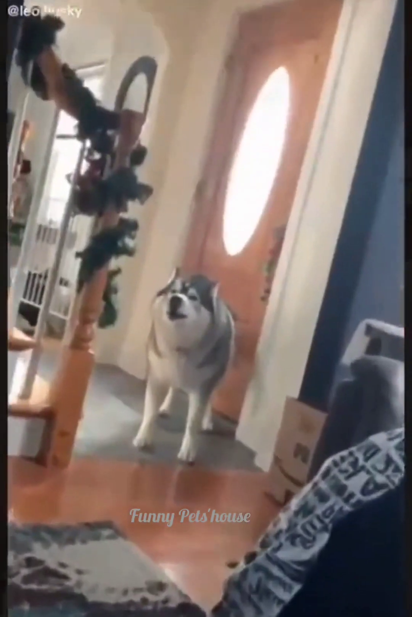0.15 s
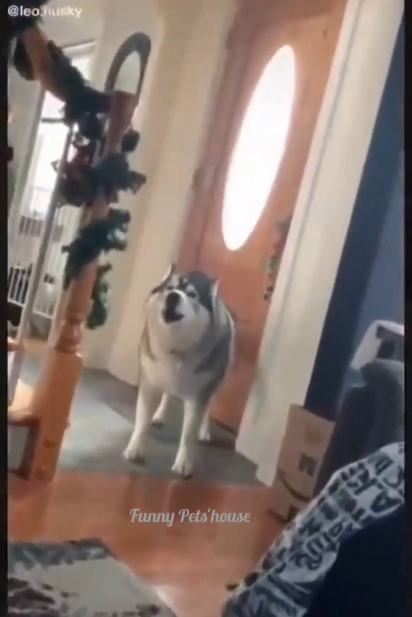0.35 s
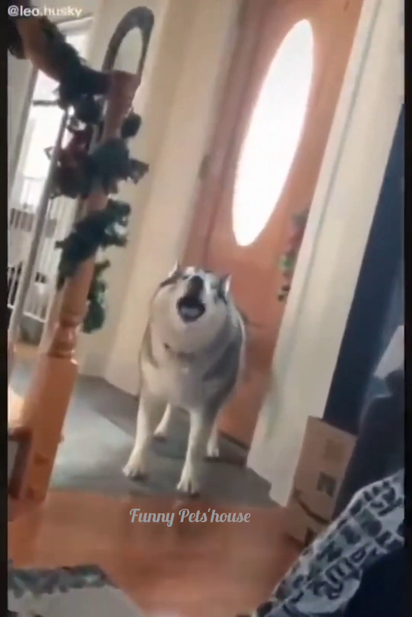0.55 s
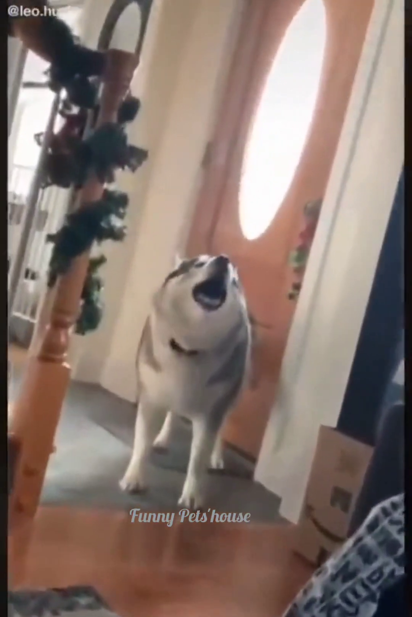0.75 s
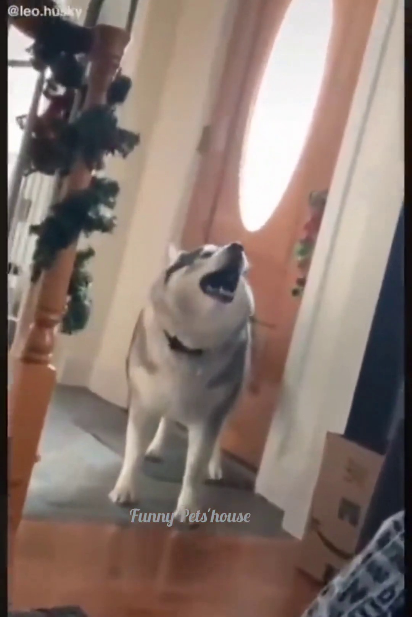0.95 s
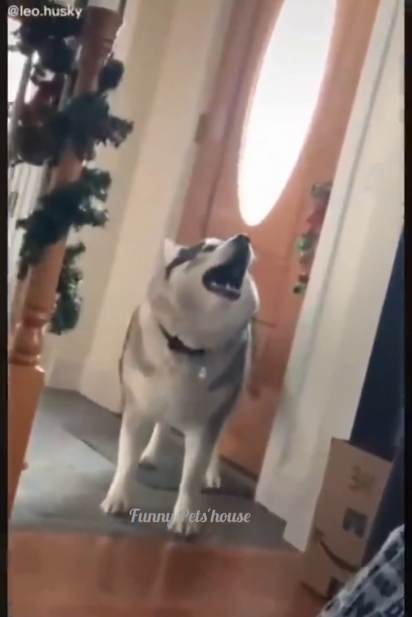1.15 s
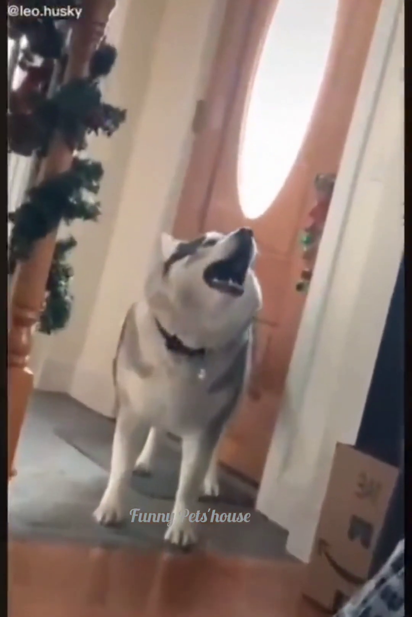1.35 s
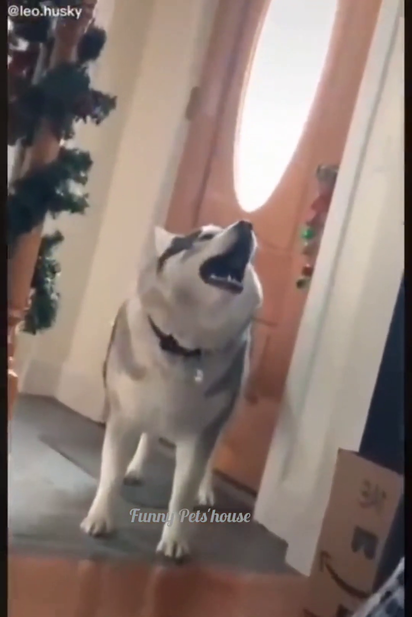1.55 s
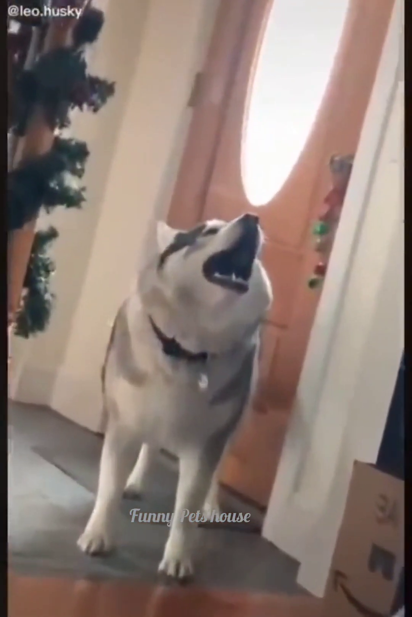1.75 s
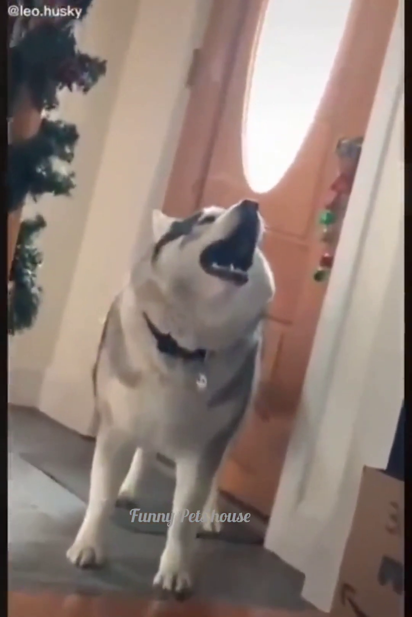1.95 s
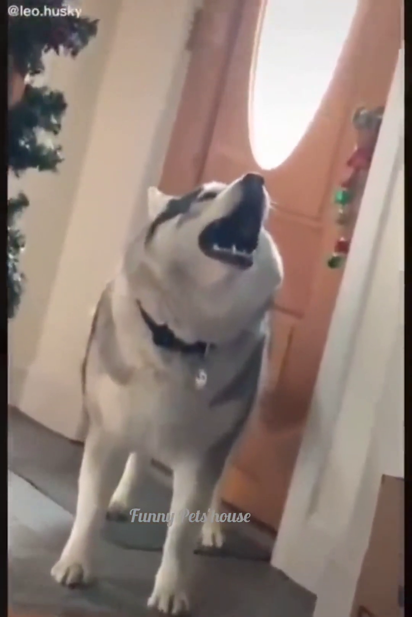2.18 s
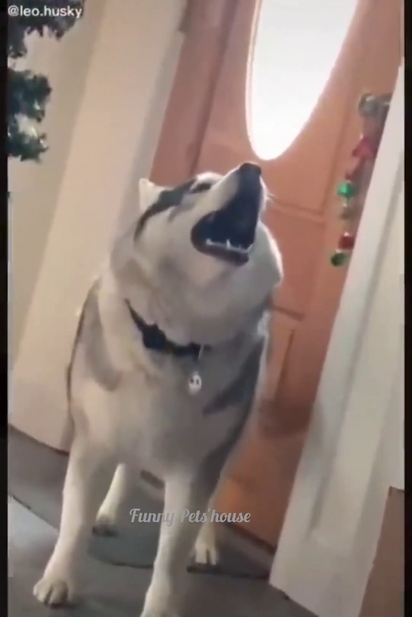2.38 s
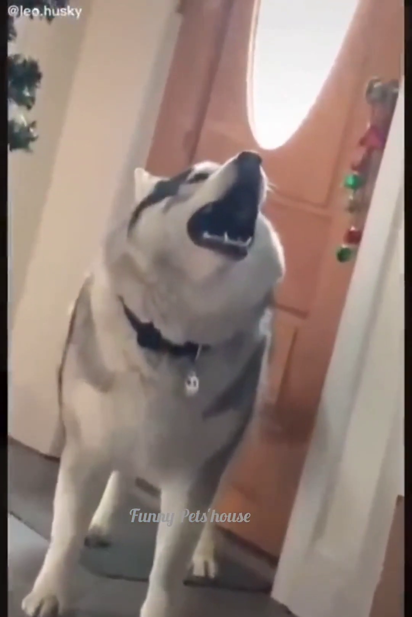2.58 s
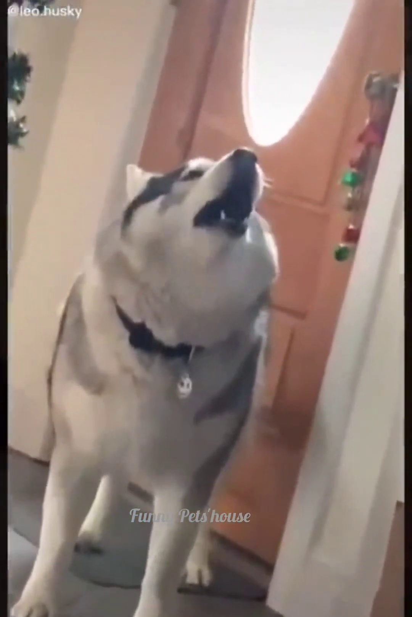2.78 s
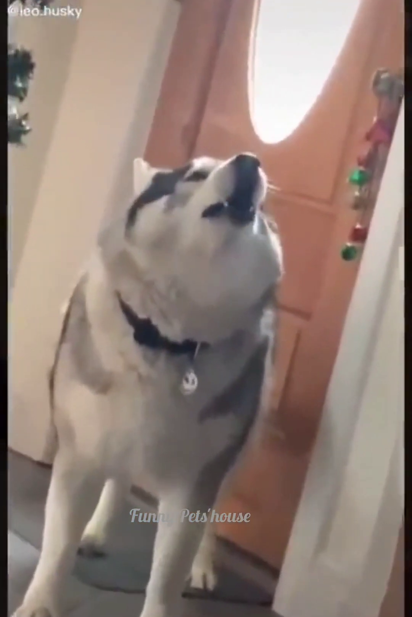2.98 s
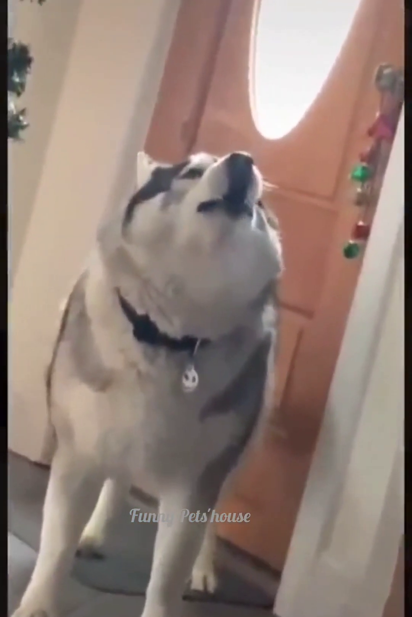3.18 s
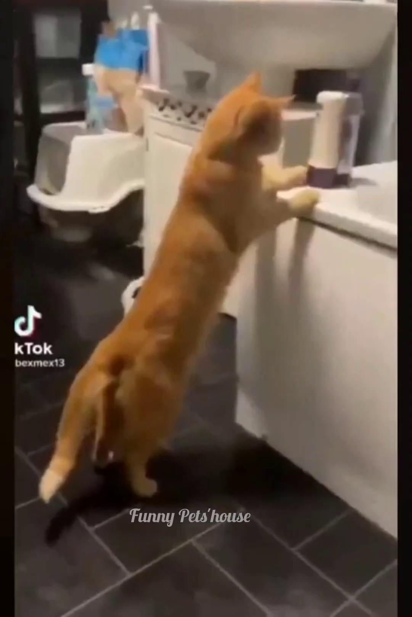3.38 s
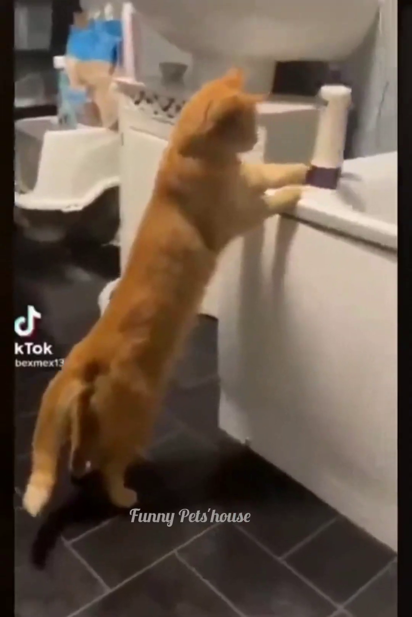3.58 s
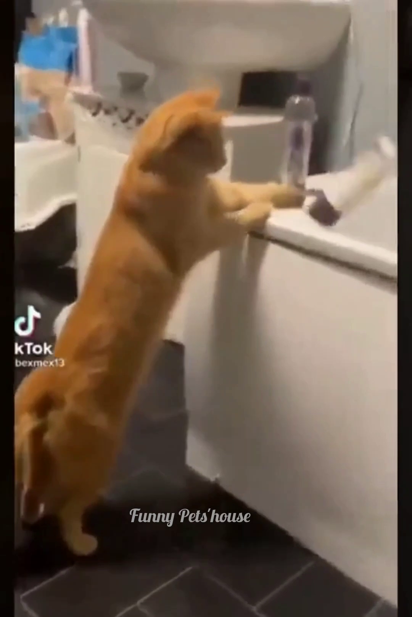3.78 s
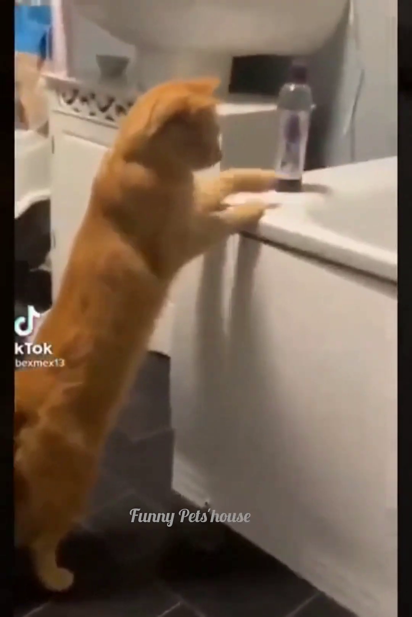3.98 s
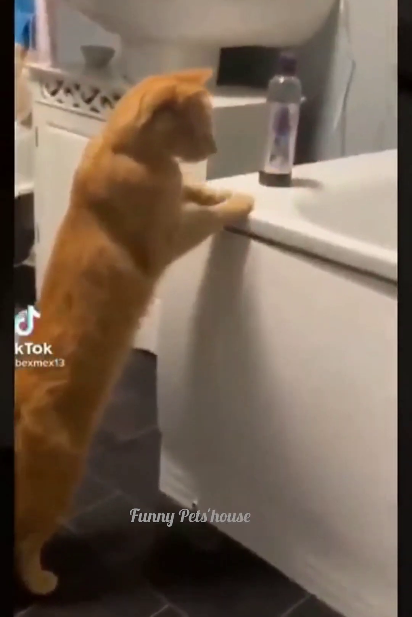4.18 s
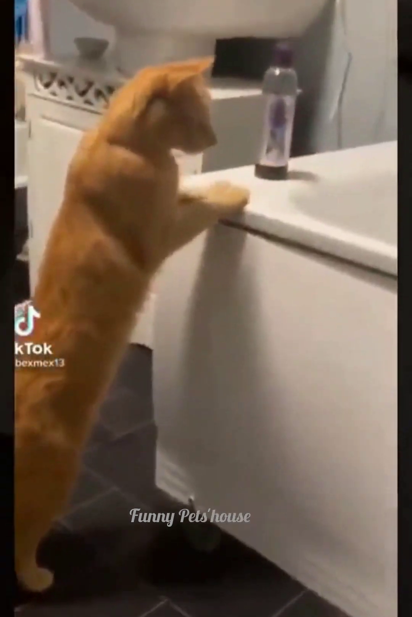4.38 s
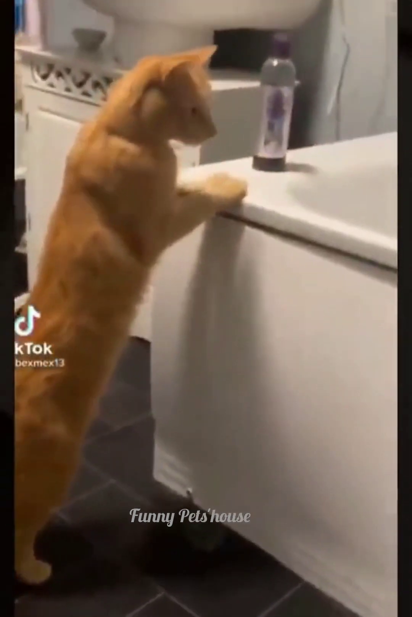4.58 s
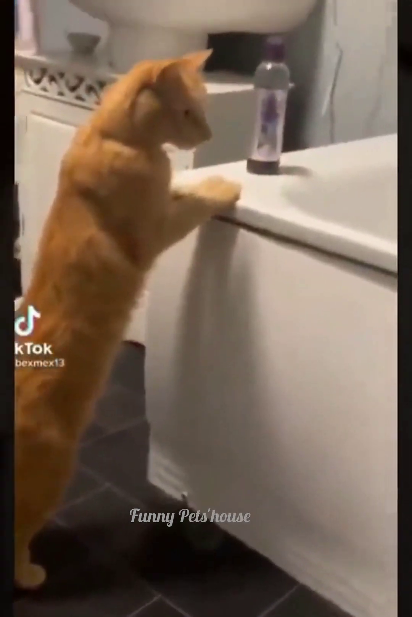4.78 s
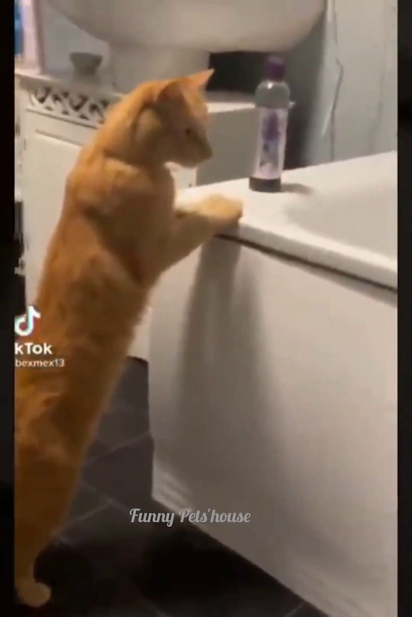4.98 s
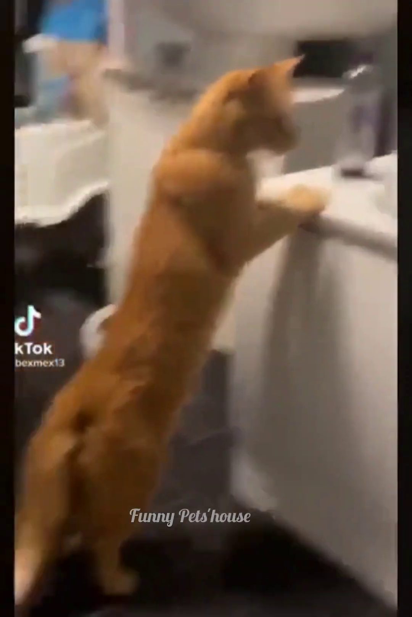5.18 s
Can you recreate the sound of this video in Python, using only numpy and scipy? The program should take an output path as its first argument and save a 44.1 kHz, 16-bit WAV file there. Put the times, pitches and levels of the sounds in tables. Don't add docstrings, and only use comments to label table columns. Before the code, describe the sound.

Quiet hallway rumble and soft hiss open the clip. At about 0.2 s a large dog starts a low, pulsing moan in a half-closed throat, stumbling and rising until 0.6 s, when it breaks with a brief rasp into a loud howl. Faint paw steps fall around 0.7 s. The pitch climbs quickly to a high, clear, almost flute-like note by 1 s and holds, slightly swelling and fading, with a short hall echo. Around 2.4 s it cracks for an instant, resumes softer and sags, ending at 3 s with a small puff as the jaw closes. At 3.4 s the sound cuts to a hushed bathroom. Faint bottle contacts build from 3.5 s; at 4.1 s the bottle hits the empty tub with a sudden deep, hollow bang and plastic clatter. The walls ring dully, uneven knocks follow until 4.6 s, then small rolling rattles fade, with another light knock near 5.1 s.

```python
import sys
import numpy as np
from scipy import signal
from scipy.fft import rfft, irfft, next_fast_len
from scipy.io import wavfile
from scipy.ndimage import uniform_filter1d, minimum_filter1d, map_coordinates

SR = 44100
rng = np.random.default_rng(int(sys.argv[2]) if len(sys.argv) > 2 else 0)


def transcribe(signal):
    frames = np.atleast_2d(signal).T
    limited = np.clip(frames, -1, 1)
    pcm = np.round(limited * 32767).astype(np.int16)
    wavfile.write(sys.argv[1], SR, pcm)


def boost_factor(decibels):
    exponent = np.asarray(decibels, float) / 20
    return 10 ** exponent


N = 231026
TIME = np.arange(N) / SR
CLOCK = np.arange(0, N + 32, 32) / SR
CUT = 3.367
RASP_FLOOR_DB = -71

# time in seconds, pitch in Hz, level in dB.
MOAN = [
    (0.229, 284.2, -58.5),
    (0.251, 281.3, -39.5),
    (0.338, 308.8, -27),
    (0.447, 314.6, -33),
    (.478, 325, -24.5),
    (0.514, 344.8, -25),
    (.535, 347, -17.5),
    (0.569, 375.4, -20.5),
    (0.596, 423.7, -21.5),
]
# time in seconds, rasp level in dB, rasp fall in dB
# per second, level of the half-pitch lines in dB, their fall in dB per second.
BREAKS = [
    (.592, -36, 190, -33, 280),
    (.7, -51, 36, -70, 40),
    (1.635, -58, 3, -80, 5),
    (2.42, -36.5, 150, -33, 220),
    (2.452, -40, 300, -38, 150),
    (2.99, -34, 380, -42.5, 700),
]


def unit(x):
    return x / np.sqrt(np.mean(x ** 2) + 1e-20)


def along(points, hz):
    f, v = np.transpose(points)
    return np.interp(np.log(hz + 1), np.log(f + 1), v)


def curves(rows):
    s, *columns = np.transpose(rows)
    return [np.interp(TIME, s, c) for c in columns]


def gate(start, stop, fade):
    return np.clip(np.minimum(TIME - start, stop - TIME) / fade, 0, 1)


def bell(s, length):
    return np.interp(TIME, CLOCK, np.exp(-((CLOCK - s) / length) ** 2))


def wobble(rate):
    knots = rng.standard_normal(int(N * rate / SR) + 4)
    return np.interp(TIME, CLOCK, map_coordinates(knots, [CLOCK * rate]))


def noise(spectrum):
    m = next_fast_len(N)
    colour = boost_factor(along(spectrum, np.fft.rfftfreq(m, 1 / SR)))
    return unit(irfft(rfft(rng.standard_normal(m)) * colour, m)[:N])


def patchy_field(shape, bins, frames):
    field = uniform_filter1d(rng.standard_normal(shape), size=bins, axis=0)
    return unit(uniform_filter1d(field, size=frames, axis=1))


def patched(x, patchy_db):
    z = signal.stft(x, nperseg=512)[2]
    gain = boost_factor(patchy_db * patchy_field(z.shape, 4, 10))
    return unit(signal.istft(z * gain, nperseg=512)[1][:N])


def rings(rows, unsteady_db, drift):
    out = np.zeros(N)
    for s, hz, db, t60, *rise in rows:
        span = slice(round(s * SR), min(round((s + 1.4) * SR), N))
        t = np.arange(span.stop - span.start) / SR
        rise_s = rise[0] if rise else .01
        fall = boost_factor(db - 60 * t / t60 + unsteady_db * wobble(25)[span])
        swell = (1 - np.exp(-t / rise_s)) * fall
        out[span] += swell * np.sin(2 * np.pi * hz * t + drift * wobble(30)[span])
    return out


def room_air():
    # frequency in Hz, level in dB per Hz.
    rumble_colour = [(15, -19), (30, -1), (70, 1), (120, -5), (200, -27.5), (400, -120)]
    # frequency in Hz, level in dB per Hz.
    hiss_colour = [(100, -50), (170, -8), (450, -3.5), (900, -6.5), (1300, -19), (2000, -9), (3200, -20),
                   (5000, -24.5), (9000, -32.5), (11000, -120)]
    duck_from, duck_to = 0.57, 3.08
    duck = np.clip((TIME - duck_from) / (duck_to - duck_from), 0, 1) * gate(-1, duck_to, .05)
    settle_db = 57 * np.clip(TIME - duck_to - .05, 0, None)
    rumble_db = -62.5 - 17 * duck - settle_db
    rumble_db += 10 * bell(.72, .09)
    rumble_db += 1.5 * wobble(8)
    hiss_db = -64 - 5.5 * duck + 1.5 * wobble(3.2)
    return boost_factor(rumble_db) * noise(rumble_colour) + boost_factor(hiss_db) * patched(noise(hiss_colour), patchy_db=2.0)


def hall(x):
    # frequency in Hz, time to fall by 60 dB in seconds.
    ring_time = [(200, 0.25), (800, 0.55), (3000, 0.34), (8000, 0.042)]
    hz, t, z = signal.stft(rng.standard_normal(SR), SR, nperseg=256)
    tail = signal.istft(z * boost_factor(-60 * t / along(ring_time, hz)[:, None]), SR, nperseg=256)[1]
    late = np.pad(x, (350, 0))
    return signal.fftconvolve(late, tail / np.linalg.norm(tail))[:N]


def shaking(layer_db, share, slower, still_db):
    # time in seconds, strength in dB, brightness in dB,
    # rise in seconds, time to fall by 60 dB in seconds.
    contacts = [(3.49, -77, 6, 0.033, 3.3), (3.575, -59.5, 4.5, 0.042, 3.04), (3.72, -59, -10, 0.032, 1.6),
                (3.875, -52.5, -2.5, 0.045, 1.5), (3.92, -43, -6, 0.022, 4.2),
                (4.071, -15.5, 2, 0.014, 1.6), (4.133, -14.5, 4, 0.016, 0.52),
                (4.21, -18.5, -21, 0.0099, 0.7), (4.25, -57.5, 14, 0.089, 6.3),
                (4.33, -31, 2.5, 0.029, 2.29), (4.385, -27, -3, 0.015, 1.6), (4.43, -24, 0, 0.022, 0.71),
                (4.49, -27, -1, .03, .8), (4.165, -18, 5, .015, .5), (4.628, -44.5, 9.5, 0.0066, 1.7),
                (4.754, -39, 8, 0.017, 0.54), (4.978, -51, 11.5, 0.011, 1.2),
                (5.08, -37.5, -2.5, 0.036, 2.3)]
    s, db, bright_db, rise, t60 = np.transpose(contacts)[..., None]
    t = np.clip(CLOCK - s, 0, None)
    fall_db = 60 * t / (t60 * slower)
    each = boost_factor(db + layer_db + share * bright_db - fall_db) * np.clip(t / rise, 0, 1) ** 2
    return np.interp(TIME, CLOCK, np.sqrt(boost_factor(2 * still_db) + np.sum(each ** 2, 0)))


def tumble():
    # frequency in Hz, level in dB per Hz.
    boom = [(12, -62), (25, -38), (50, -16), (73, 6.5), (95, -3), (120, 7), (170, -4), (250, -60),
            (500, -120)]
    # frequency in Hz, level in dB per Hz.
    knock = [(50, -120), (110, -92), (170, 7.5), (300, 7), (500, 3.5), (900, -9), (1300, -66), (2500, -120)]
    # frequency in Hz, level in dB per Hz.
    clatter = [(300, -120), (600, -17), (900, -3), (1400, -9), (2200, -12.5), (3000, -19), (4200, -26),
               (8000, -120)]
    # frequency in Hz, level in dB per Hz.
    rattle = [(1000, -120), (2100, -27), (3000, 0), (5000, -1), (6500, -8), (8000, -8), (9900, -8),
              (10150, -120)]
    # level in dB, share of the brightness, factor on the ring time.
    layer_laws = [
        (-12.5, -0.1, 1.06),
        (-2.5, -0.16, 0.71),
        (-7.5, 0.8, 0.64),
        (-24, 2, 0.67),
    ]
    tiles_db = [-88, -86, -91, -90]
    lumps_db = (.3, .7, .9, .9)
    bumps = wobble(32)
    out = boost_factor(-82) * noise([(20, -34), (40, -4), (110, -18), (200, -34), (400, -120)])
    for law, still_db, colour, lump_db in zip(layer_laws, tiles_db, (boom, knock, clatter, rattle), lumps_db):
        strength = shaking(*law, still_db) * boost_factor(lump_db * bumps)
        out += strength * patched(noise(colour), patchy_db=1.1)
    return out


def tub():
    # start in seconds, frequency in Hz, level in dB,
    # time to fall by 60 dB in seconds, rise in seconds.
    wall_tones = [(4.155, 449, -12, 0.43, 0.018), (4.19, 384.5, -6, 0.36, 0.029),
                  (4.37, 212.2, -20.5, 1.59, 0.015), (4.4, 233.6, -35.5, 5.5, .03),
                  (4.48, 1298, -33, 1.3, 0.014), (4.24, 392, -13, .4, .015), (4.52, 233, -29, 1.2, .03),
                  (4.5, 1394, -29.5, 0.39, 0.03), (5.0, 1990, -49.5, 0.51, 0.014),
                  (3.92, 360, -39.5, 1.4, 0.032), (3.92, 249.4, -35.5, 0.91, 0.072),
                  (4.1, 76.3, -21, 1.1, 0.056), (4.55, 125, -31.5, 0.68, .06),
                  (4.93, 237.2, -42.5, 6.1, 0.13), (4.6, 372.5, -37, 0.87, 0.0069),
                  (3.955, 470, -38, 0.31, .015), (3.99, 330, -38, 0.26, .012),
                  (4.8, 290, -49.5, 0.43, 0.02)]
    # time in seconds, level in dB, length in seconds.
    splash = [
        (4.086, -63, 0.018),
        (4.115, -67, .02),
    ]
    edge = noise([(9000, -120), (9800, -4), (10700, 0), (11000, -120)])
    edge_size = sum(boost_factor(db) * np.exp(-((TIME - s) / length) ** 2) for s, db, length in splash)
    return rings(wall_tones, unsteady_db=1.8, drift=0.89) + edge * edge_size


def lick():
    # time in seconds, level in dB,
    # length in seconds, extra level of the top in dB.
    puffs = [
        (.65, -43, .055, -1.5),
        (2.435, -73, 0.031, 0),
        (3.103, -53.5, 0.054, -7.5),
        (3.15, -51.5, .012, 1),
    ]
    # frequency in Hz, level in dB per Hz.
    body_colour = [(100, -58.5), (300, 0), (1500, -1.5), (2900, -5), (3400, -40)]
    # frequency in Hz, level in dB per Hz.
    top_colour = [(2600, -40.5), (3300, -5), (4300, -9), (5200, -6.5), (6100, -11), (6900, -50)]
    # time in seconds, level in dB, length in seconds.
    steps = [
        (.655, -46, .008),
        (.73, -43, .007),
    ]
    # frequency in Hz, level in dB per Hz.
    paw_colour = [(30, -21), (80, 0), (220, -2), (400, -30)]
    body = sum(boost_factor(db) * bell(s, length) for s, db, length, top_db in puffs)
    top = sum(boost_factor(db + top_db - 2) * bell(s, length) for s, db, length, top_db in puffs)
    paws = sum(boost_factor(db) * bell(s, length) for s, db, length in steps)
    return noise(body_colour) * body + patched(noise(top_colour), patchy_db=4.5) * top + noise(paw_colour) * paws


def moan():
    # frequency in Hz, gain in dB.
    throat = [(300, -24.5), (630, 6.5), (950, -11), (1260, -11), (1570, -26.5), (1900, -25), (2200, -5.5),
              (2520, -26.5), (2850, -27.5), (3200, -33.5), (3700, -47), (4500, -57.5), (5500, -36),
              (6400, -38)]
    # time in seconds, change in dB, length in seconds.
    gulps = [(.459, -6.5, .008), (.495, -7, 0.0057), (.517, -7.5, .006), (0.531, 2.5, 0.0061),
             (.549, -6, 0.0049)]
    # start in seconds, frequency in Hz, level in dB, time to fall by 60 dB in seconds.
    catches = [(.232, 400, -42, .5), (.24, 680, -42, .4), (.255, 1150, -32, .4), (.33, 2180, -38, .5),
               (.578, 900, -22, .12), (2.975, 760, -29, .5), (2.99, 730, -30, .3), (2.988, 1260, -31, .12),
               (3.0, 1480, -40, .35), (3.085, 215, -55, .3), (.66, 190, -55, .5)]
    n = SR * 2 // 3
    hz, db = (c[:n] for c in curves(MOAN))
    db = db + sum(gulp_db * bell(s, length)[:n] for s, gulp_db, length in gulps)
    first_db = db - 20.5 + 0.18 * np.abs(hz - 320)
    hz = hz * (1 + .0045 * wobble(90)[:n])
    turn = 2 * np.pi * np.cumsum(hz) / SR
    k = np.arange(1, 19)[:, None]
    size = boost_factor(along(throat, k * hz)) * (k * hz < 6400)
    size *= boost_factor(db - 0.2) / np.sqrt(np.sum(size ** 2, 0))
    size[0] = boost_factor(first_db)
    air = boost_factor(db - 22) * noise(throat)[:n] * (1 + .6 * np.cos(turn))
    air += boost_factor(db - 43) * noise([(4000, -120), (4800, -2.0), (5600, -2.5), (6400, -0.5), (6700, -120)])[:n]
    size *= boost_factor(3.5 * np.array([wobble(30)[:n] for _ in k]))
    pulses = np.sqrt(2) * np.sum(size * np.sin(k * turn), 0)
    voiced = np.pad(pulses + air, (0, N - n)) * gate(MOAN[0][0], MOAN[-1][0] + 0.011, 0.019)
    return voiced + rings(catches, unsteady_db=3, drift=.8)


def standing():
    # time in seconds,
    # partial number, change in dB, length in seconds.
    spots = [(0.618, 1, -5.5, 0.008), (0.708, 1, -13, .015), (0.737, 3, -18.5, .015), (0.805, 1, -5, 0.038),
             (0.903, 1, -11.5, 0.027), (1.179, 2, -14, 0.018), (1.39, 2, -14.5, 0.061),
             (1.609, 1, -6, .009), (1.637, 1, 2, .02), (1.638, 3, 4.5, 0.0098), (1.298, 2, -5, .2),
             (1.639, 2, -20.5, 0.0082), (2.08, 2, 5, .12), (2.085, 4, 7, 0.19), (2.256, 2, -22.5, .018),
             (2.5, 2, -6.5, 0.042), (2.9, 2, -10.5, 0.025), (2.966, 1, -7.5, 0.012), (1.06, 1, 2.5, .08),
             (1.05, 2, -4, .1), (1.45, 4, -9, 0.38), (1.76, 1, 0, 0.1), (1.8, 2, 4.5, .12),
             (2.34, 1, 3.5, .07), (2.7, 4, 9.5, 0.36), (2.72, 1, 2, .08), (.66, 4, 5.5, 0.038),
             (3.005, 4, -11, .025), (1.696, 3, 0, 0.043), (2.995, 2, 11.5, .015),
             (1.0, 5, 6, .04), (1.12, 5, -17, .02), (1.28, 5, 5, .04), (1.55, 5, 3.5, .04),
                  (2.08, 5, -6.5, .17), (2.29, 5, -19, .035), (2.37, 5, -9, .04), (2.925, 5, 12, .035),
                  (1.24, 7, -9, .06), (1.639, 7, -11.5, .02), (1.802, 7, 4, .06), (2.35, 7, -5.5, .05),
                  (2.58, 7, -12, .05), (2.85, 7, -12, .09), (.82, 8, 5, .04), (.68, 8, -8, .04),
                  (.9, 6, 8, .04), (1.102, 8, 5, .04), (1.2, 8, -5, .03), (1.55, 8, 6, .03),
                  (1.77, 8, 4.5, .1), (2.012, 8, -6.5, .05), (2.33, 8, -8.5, .04), (2.512, 8, -11, .03),
                  (2.74, 8, -7, .04), (2.828, 8, 4, .04), (1.9, 6, 9, .1), (1.34, 6, 8, .04),
                  (2.08, 6, -13.5, .05), (2.717, 6, -18.5, .06), (2.92, 6, -18.5, .04),
                  (3.0, 5, -18.5, .028), (2.99, 7, -19.5, .04), (2.997, 8, -18, .03), (.7, 5, 6, .06),
                  (.68, 7, -8, .04), (1.03, 4, 6.5, .05), (1.248, 4, -3, .04), (2.96, 4, 6.5, .015),
                  (3.006, 3, -7.5, .015), (0.653, 1, 3.5, .012), (.674, 1, -8.5, .006), (0.69, 1, 5, .007),
                  (0.725, 1, -8.5, .005), (.735, 1, 4.5, .01), (1.71, 1, -3.5, .02), (2.716, 2, 4, .06)]
    s, k, db, length = np.transpose(spots)[..., None]
    bumps = db * np.exp(-((CLOCK - s) / length) ** 2)
    return [np.interp(TIME, CLOCK, bumps[np.round(k[:, 0]) == n].sum(0)) for n in range(1, 9)]


def unsteady():
    s, rasp_db, rasp_fall, half_db, half_fall = np.transpose(BREAKS)[..., None]

    def peak(db, fall):
        rise_db = 1000 * (s - CLOCK)
        return boost_factor(db - np.maximum(rise_db, fall * (CLOCK - s)))

    rasp = peak(rasp_db, rasp_fall)
    rasp = (boost_factor(RASP_FLOOR_DB) + rasp[:-1].sum(0)) * (CLOCK < s[-1]) + rasp[-1]
    half = boost_factor(-85) + peak(half_db, half_fall).sum(0)
    return [np.interp(TIME, CLOCK, 20 * np.log10(v + 1e-9)) for v in (rasp, half)]


def howl():
    # time in seconds, pitch in Hz.
    pitch = [
        (.59, 548),
        (.65, 622),
        (.73, 688),
        (.82, 732),
        (.92, 760),
        (1.25, 776),
        (2.14, 770.5),
        (2.33, 764),
        (3.0, 746.5),
    ]
    # time in seconds, level in dB, mouth opening in dB.
    effort = [
        (.59, -23.5, -4.5),
        (.75, -10.5, 2.5),
        (1.0, -11, -3.5),
        (1.55, -12.5, 0.5),
        (1.73, -17, 3.5),
        (2.07, -13, 3),
        (2.38, -16, -0.5),
        (2.87, -18.5, -5.5),
        (3.0, -30, 8.5),
    ]
    # time in seconds, step in Hz.
    slips = [
        (1.585, 9.5),
        (2.62, 6),
    ]
    # frequency in Hz, gain in dB.
    throat = [(550, 5), (780, -6), (1100, -26), (1550, -17.5), (1800, -12.5), (2300, -8.5), (2750, -22.5),
              (3100, -33.5)]
    fade_db = [.4, 1, .4, 1.2]
    # partial number, level in dB under partial 3.
    high_partials = [(5, -24.5), (6, -51.5), (7, -34), (8, -27)]
    # frequency in Hz, level in dB.
    half_colour = [(390, -24.5), (1150, -4.5), (1900, -7), (2700, -5), (3500, -27), (4300, -30.5),
                   (6000, -31)]
    # frequency in Hz, level in dB per Hz.
    rasp_colour = [(250, -67), (500, -25), (800, -6), (1100, -6), (1600, -5), (1950, 0), (2300, -7),
                   (2900, -19), (3800, -19.5), (4500, -35.5), (5400, -24.5), (6300, -12), (6700, -95.5)]
    start, stop = pitch[0][0], pitch[-1][0]

    hz, level_db, open_db = (uniform_filter1d(c, size=1500) for c in curves(pitch) + curves(effort))
    crack = np.exp(-((TIME - 2.437) / .021) ** 4)
    end_fall = np.exp(np.minimum(TIME - stop, 0) / .021)
    hz = hz - 40 * crack - 165 * end_fall
    hz = hz + sum(step * np.clip((TIME - s) / .02, 0, 1) for s, step in slips)
    level_db = level_db - 10 * crack

    place_db = standing()
    partial_db = []
    for k, fade in enumerate(fade_db):
        mouth_db = (k / 2 - .5) * open_db
        partial_db.append(level_db + along(throat, (k + 1) * hz) + mouth_db + fade * wobble(6.2))
    upper_db = partial_db[2] + place_db[2] / 2
    partial_db = [db + place for db, place in zip(partial_db, place_db)]

    rasp_db, half_db = unsteady()
    drift, uneven = wobble(40), wobble(300)
    scatter = .02 * np.clip(boost_factor(rasp_db + 36), 0, 1)
    turn = 2 * np.pi * np.cumsum(hz * (1 + .0004 * drift + scatter * uneven)) / SR
    tone = sum(boost_factor(db) * np.sin((k + 1) * turn) for k, db in enumerate(partial_db))
    tone *= 1 + np.clip(boost_factor(rasp_db + 16.5), 0, .5) * uneven
    lost_db = .8 * np.clip(rasp_db + 48, 0, None)
    for k, db in high_partials:
        k = round(k)
        flutter_db = 1.8 * wobble(9.49)
        size = boost_factor(upper_db + db + place_db[k - 1] - lost_db + flutter_db)
        tone += size * np.sin(k * turn + .3 * wobble(41))
    tone += boost_factor(upper_db - 30 + 3 * drift) * bell(.75, .04) * np.sin(9 * turn)

    half = np.zeros(N)
    for k in range(7):
        size = boost_factor(along(half_colour, (k + .5) * hz) + 3 * wobble(40))
        half += size * np.sin((k + .5) * turn + .55 * (k + 1) * wobble(110))
    voiced = gate(start, stop - .003, 0.0039)
    air = boost_factor(rasp_db) * patched(noise(rasp_colour), patchy_db=5.5) * gate(start, CUT, .01)
    return boost_factor(5.0) * (tone + boost_factor(half_db) * half) * voiced + air


def sheen(x):
    # frequency in Hz, level in dB per Hz.
    treble_colour = [(6550, 11), (7100, 9.5), (7850, 9), (8600, 5.5), (9400, 5.5), (10200, -16.5),
                     (10950, -2), (11500, -21.5), (11800, -27.5), (12200, -14.5), (12750, -0.5),
                     (13500, -4.5), (14300, -20.5), (15100, -19.5), (15500, -33.5)]
    patches = [
        (76, 112, 64),
        (112, 134, 64),
        (138, 180, 112),
    ]
    # level over it in dB, dB per dB of voice,
    # dB per dB of rasp.
    follow_laws = [
        (-26.5, 0.61, 0.1781),
        (-35, 0.74, 0.0658),
        (-45, 2, 0.38),
    ]
    # frequency in Hz, level in dB, start in seconds, end in
    # seconds.
    steady_tones = [
        (9819, -52, .74, 1.6),
        (11886, -69, .76, 3.0),
    ]
    # frequency in Hz, level in dB per Hz.
    veil_colour = [(11000, -40), (11400, 0), (13500, -3), (14500, -14), (15500, -25)]
    usual_db = -20
    howl_from, voice_end = BREAKS[0][0], BREAKS[-1][0]

    hz, t, z = signal.stft(x, SR, nperseg=512, noverlap=384)
    power = uniform_filter1d(uniform_filter1d(abs(z) ** 2, size=9, axis=0), size=9, axis=1)
    upper_power = abs(power[(hz > 1800) & (hz < 6500)].sum(0))
    voice_db = np.interp(TIME, t, 10 * np.log10(upper_power + 1e-12))
    moan_rough_db = 23 * gate(-1, howl_from, .01)
    rough_db = np.maximum(unsteady()[0] - RASP_FLOOR_DB, moan_rough_db)

    hoarse_db = np.minimum(-37 + 1.25 * rough_db, -1)
    filler = signal.stft(rng.standard_normal(N), SR, nperseg=512, noverlap=384)[2]
    filler /= np.sqrt(np.mean(abs(filler) ** 2))
    flat = z / np.sqrt(abs(power) + 1e-16) + boost_factor(np.interp(t, TIME, hoarse_db)) * filler
    colour = boost_factor(along(treble_colour, hz)[:, None] + 4.5 * patchy_field(z.shape, 8, 30))

    out = np.zeros(N)
    for f, db, start, stop in steady_tones:
        out += boost_factor(db + 4 + 1.5 * wobble(10)) * np.sin(2 * np.pi * f * TIME) * gate(start, stop, .01)
    veil = patched(noise(veil_colour), patchy_db=3)
    out += boost_factor(-76 + .2 * rough_db) * veil * gate(.55, voice_end + .05, .08)
    flare_db = 6 * bell(.775, .06)
    for (first, last, shift), (over_db, slope, lift) in zip(patches, follow_laws):
        high = np.zeros_like(z)
        high[first:last] = flat[first - shift:last - shift]
        copy = signal.istft(high * colour, SR, nperseg=512, noverlap=384)[1][:N]
        rasp_lift_db = lift * rough_db * gate(-1, voice_end, 0.057)
        level_db = usual_db + over_db + slope * (voice_db - usual_db) + rasp_lift_db + flare_db
        out += boost_factor(level_db) * unit(copy) * gate(MOAN[0][0], CUT, 0.056)
    return out


def hallway():
    dog = moan() + howl() + lick()
    send_db = -11 - 10 * gate(.9, 3.0, .15)
    near = dog + hall(dog * boost_factor(send_db))
    reach = uniform_filter1d(-minimum_filter1d(-abs(near), size=900), size=900)
    near /= (1 + (abs(reach) / .46) ** 6) ** (1 / 6)
    near += room_air()
    return (near + sheen(near)) * gate(-1, CUT, 0.0055)


def scene():
    bathroom = (tumble() + tub()) * gate(CUT, 9, 0.0039)
    return (hallway() + bathroom)[None]


def roll_off(x):
    return signal.sosfilt(signal.butter(12, 15590, fs=SR, output="sos"), x)


def record(dry):
    return roll_off(dry)


dry = scene()
out = record(dry)
transcribe(out)
```